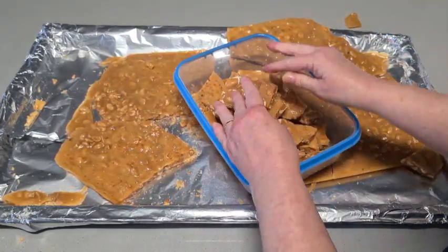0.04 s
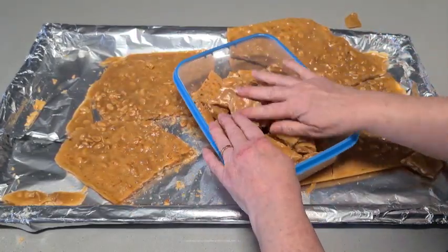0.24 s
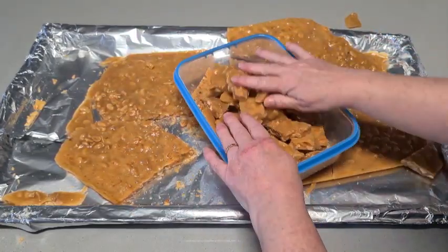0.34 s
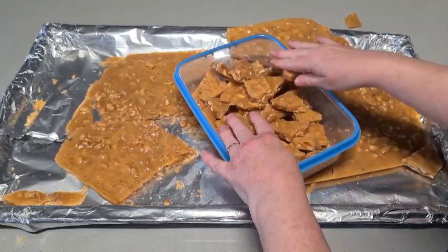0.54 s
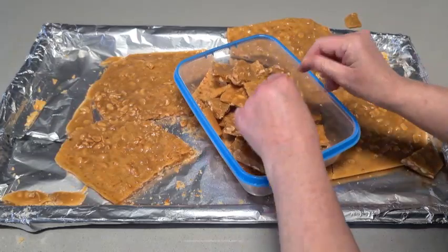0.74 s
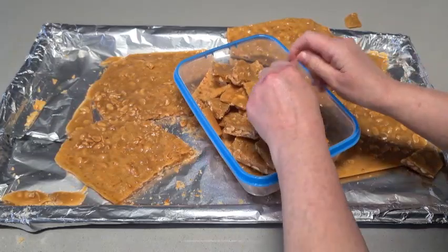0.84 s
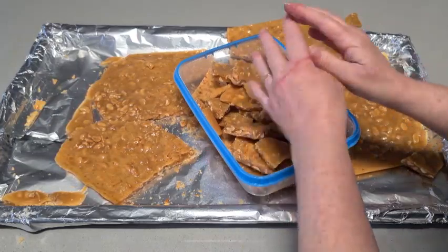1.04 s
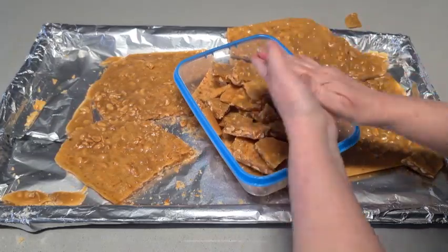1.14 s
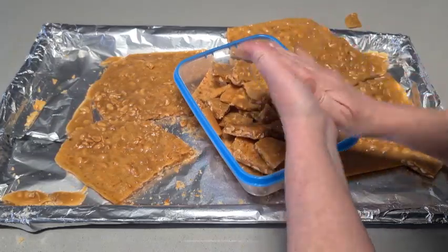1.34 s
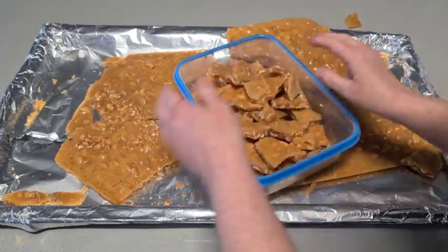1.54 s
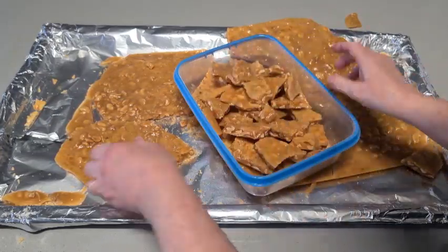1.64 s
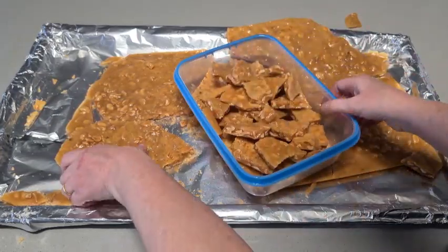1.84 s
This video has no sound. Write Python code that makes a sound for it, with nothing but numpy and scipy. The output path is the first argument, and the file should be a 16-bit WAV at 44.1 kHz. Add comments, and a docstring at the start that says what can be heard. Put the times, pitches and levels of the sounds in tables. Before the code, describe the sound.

Brittle candy shards are pressed and shifted by hand, clacking densely against plastic with foil crackle and a ringing tray, then sparse light ticks over faint hum, heard close in a small hard-walled kitchen.

```python
"""Over faint air and appliance hum, pieces of peanut brittle grind and foil rustles, then shards snap and knock.
Hands press and shift them in a plastic tub on a foil-lined tray: grains of filtered noise grind, rustle and slide.
Each knock is a noise crack, a noise thud of the tub and the damped modes of a shard; the tray rings on after it.
Heavy presses boom, loose pieces clink, and a decaying noise response adds the live kitchen."""
import sys
import numpy as np
from scipy import signal
from scipy.fft import rfft, irfft, next_fast_len
from scipy.io import wavfile

SR = 44100
rng = np.random.default_rng(int(sys.argv[2]) if len(sys.argv) > 2 else 0)


def wav_record(signal):
    """Record a signal, one row per channel, as 16-bit PCM in the file named by sys.argv[1]."""
    frames = np.transpose(np.atleast_2d(signal))
    bounded = np.clip(frames, -1, 1)
    # unit amplitude maps onto the largest positive 16-bit level
    quanta = np.round(bounded * 32767).astype(np.int16)
    wavfile.write(sys.argv[1], SR, quanta)


N = 83790
HIT_S, RING_S = 0.045, 0.36  # lengths of short and long sounds
CONTACT_S = 0.00035  # time constant of a contact's rise


def amp(db):
    """Decibels to gain."""
    return 10 ** (np.asarray(db) / 20)


def unit(x):
    """Scale to rms 1."""
    return x / np.sqrt(np.mean(x ** 2))


def fade(t, t60_s):
    """Exponential decay, 60 dB down at t60_s."""
    return np.exp(-np.log(1000) * t / t60_s)


def along(points):
    """Gain over time from (time_s, level_db) points."""
    time_s, level_db = np.array(points).T
    return amp(np.interp(np.arange(N) / SR, time_s, level_db))


FILTER_SIZE = 4096


def colour(x, points):
    """Minimum-phase filter through (freq_hz, level_db) points, by way of the folded cepstrum."""
    half = FILTER_SIZE // 2
    freq_hz, level_db = np.array(points).T
    bin_hz = np.arange(half + 1) * SR / FILTER_SIZE
    gain = amp(np.interp(np.log(bin_hz + 1), np.log(freq_hz), level_db))
    cepstrum = irfft(np.log(gain))
    cepstrum[1:half] *= 2
    response = irfft(np.exp(rfft(cepstrum[:half], FILTER_SIZE)))[:half]
    size = next_fast_len(x.shape[-1] + half, True)
    return irfft(rfft(x, size) * rfft(response, size), size)[..., :x.shape[-1]]


# difference between the two microphones: freq_hz, side_minus_mid_db
WIDTH = [(60, -7), (250, -16), (400, -10.5), (800, -3.5), (2000, -1.5), (6000, 2), (16000, 0.5)]


def stereo(pair):
    """Two unrelated signals become mid and side: alike in the bass, apart in the treble."""
    mid, side = pair[0], colour(pair[1], WIDTH)
    return np.array([mid + side, mid - side])


def grains(rate_hz, spread_db, t60_s, spectrum):
    """A stream of tiny decaying contacts of very uneven size, at rms 1."""
    size_db = spread_db * np.minimum(rng.exponential(size=N), np.pi)
    clicks = (rng.random(N) < rate_hz / SR) * amp(size_db)
    power = signal.lfilter([1], [1, -fade(2 / SR, t60_s)], clicks ** 2)
    noise = np.sqrt(power) * rng.standard_normal((2, N))
    return unit(colour(stereo(noise), spectrum))


def bursts(t60_s, spectrum, count):
    """Contacts, each one new: a fast rise and a dense, quickly damped ring of noise."""
    t = np.arange(int(HIT_S * SR)) / SR
    noise = rng.standard_normal((2, count, len(t)))
    envelope = fade(t, t60_s) * (1 - np.exp(-t / CONTACT_S))
    return colour(stereo(noise * envelope), spectrum).swapaxes(0, 1)


def pitched(modes, hz):
    """Mode ratios become frequencies."""
    return [(hz * ratio, db) for ratio, db in modes]


def ring(modes, t60_s, length_s, scatter_db, phase_cycles):
    """Damped modes of random strength and phase; with phase_cycles 0 the mid starts in step, as one hard knock."""
    t = np.arange(int(length_s * SR)) / SR
    pair = np.zeros((2, len(t)))
    for hz, db in modes:
        gain = amp(db + scatter_db * rng.standard_normal((2, 1)))
        phase = rng.random((2, 1)) * [[phase_cycles], [1]]  # the side is always random
        pair += gain * np.sin(2 * np.pi * (hz * t + phase))
    return stereo(pair * fade(t, t60_s) * (1 - np.exp(-t / CONTACT_S)))


# where the hands work: time_s, right (0 centre, 1 far right)
PLACE = [(0, 0.13), (.4, 0.16), (.61, .35), (.66, 0.13), (.8, 0.13), (1.1, 1), (1.37, 0.97), (1.54, 0.27),
         (1.65, 0.92)]
LEVEL_S = 0.003
# ears at far right; the left delay and both gains scale with place, the right delay is constant
LEFT_DELAY_S, LEFT_GAIN_DB = 0.00044, -2.1
RIGHT_DELAY_S, RIGHT_GAIN_DB = 0.00024, 0.18


def add(out, start_s, x, level_db):
    """Place a short sound where the hands are, its energy equal to LEVEL_S at level_db before panning."""
    right = np.interp(start_s, *np.array(PLACE).T)
    x = unit(x) * amp(level_db) * np.sqrt(LEVEL_S * SR / x.shape[1])
    ears = [(LEFT_GAIN_DB, abs(right * LEFT_DELAY_S)), (RIGHT_GAIN_DB, RIGHT_DELAY_S)]
    for ear, (gain_db, delay_s) in enumerate(ears):
        i = max(int((start_s + delay_s) * SR), 0)
        out[ear, i:i + x.shape[1]] += x[ear, :N - i] * amp(gain_db * right)


# still air: freq_hz, level_db
QUIET = [(20, -40), (55, 6), (130, -4.5), (200, -10.5), (400, -2), (600, -15.5), (1500, -27), (4000, -24.5),
         (9000, -34.5), (16000, -23)]
QUIET_DB, HUM_DB, HUM_HZ = -65, -64, 99.6


def background():
    """Still air as filtered noise and the hum of an appliance as one sine."""
    air = unit(colour(stereo(rng.standard_normal((2, N))), QUIET))
    hum = unit(np.sin(2 * np.pi * HUM_HZ * np.arange(N) / SR))
    return amp(QUIET_DB) * air + amp(HUM_DB) * hum


# pieces grinding together, before GRIT_DB: time_s, level_db
GRIND = [(0, -51.5), (.06, -60), (.168, -72), (.19, -48), (.225, -44), (.3, -30.5), (.325, -62),
         (.37, -42.5), (.42, -34.5), (.48, -37), (.55, -30), (.59, -47), (.66, -36.5), (.74, -45.5),
         (.88, -49.5), (1.0, -65), (1.08, -54.5), (1.2, -73), (1.5, -78.5), (1.61, -77), (1.7, -63.5),
         (1.77, -78), (1.9, -70)]
# spectrum of the grinding: freq_hz, level_db
GRIT = [(50, -19.5), (170, -30), (400, 6), (800, -0.5), (1400, 2.5), (2800, -3), (4300, -11), (6300, -26.5),
        (8500, -22.5), (16000, -48)]
GRIT_DB = -1.5


def grinding():
    """Rough edges catch and slip under the hands."""
    grit = grains(rate_hz=500, spread_db=1, t60_s=0.017, spectrum=GRIT)
    return amp(GRIT_DB) * along(GRIND) * grit


# foil rustle: time_s, level_db
FOIL = [(0, -53), (.09, -63.5), (.165, -73), (.2, -66), (.22, -49), (.27, -44), (.32, -69), (.37, -57),
        (.39, -47.5), (.47, -49), (.55, -49.5), (.66, -44.5), (.76, -56), (1.0, -71), (1.065, -55),
        (1.12, -74), (1.22, -89), (1.29, -68), (1.37, -64), (1.43, -89), (1.53, -88), (1.555, -55.5),
        (1.63, -66.5), (1.68, -60), (1.75, -73.5), (1.9, -63.5)]
# creases flicking over: start_s, level_db
CREASES = [(0.025, -45), (0.068, -54), (0.076, -47.5), (0.193, -50), (0.2057, -36), (0.23, -43),
           (0.25, -32), (.255, -27.5), (.258, -34), (0.382, -40.5), (0.397, -40), (.410, -36),
           (.541, -34.5), (1.253, -58.5), (1.5048, -48.5), (1.544, -47.5), (1.6456, -42), (1.661, -42),
           (1.756, -55), (1.7673, -48)]
# spectrum of rustle and creases: freq_hz, level_db
CRINKLE = [(400, -54), (1500, -11), (3500, -1.5), (4800, -0.5), (6600, 6), (8500, -5), (11000, -1),
           (13500, 1), (16000, -8)]
CREASE_T60_S = 0.023


def foil():
    """Single creases flick over above a fine rustle."""
    out = along(FOIL) * grains(rate_hz=4800, spread_db=4.5, t60_s=0.0089, spectrum=CRINKLE)
    creases = bursts(CREASE_T60_S, CRINKLE, count=len(CREASES))
    for (start_s, level_db), crease in zip(CREASES, creases):
        add(out, start_s, crease, level_db)
    return out


def through(x, response):
    """Pass sound through a response of unit energy."""
    response = unit(response) / np.sqrt(response.shape[1])
    return signal.fftconvolve(x, response, axes=1)[:, :N]


# spectrum of the kitchen's tail: freq_hz, level_db
KITCHEN = [(60, -21.5), (200, -4.5), (450, -2), (900, 1), (2500, 2.5), (6000, 3), (10000, 4.5),
           (16000, 3.5)]
ROOM_DB, ROOM_T60_S, ROOM_TREBLE_T60_S = -5, 0.69, 0.21
ROOM_START_S, ROOM_RISE_S = 0.0014, 0.0028


def kitchen(x):
    """Hard walls return a diffuse tail whose treble dies first."""
    t = np.arange(SR) / SR
    noise = stereo(rng.standard_normal((2, SR)))
    low = signal.sosfiltfilt(signal.butter(1, 3500, fs=SR, output="sos"), noise)
    tail = low * fade(t, ROOM_T60_S) + (noise - low) * fade(t, ROOM_TREBLE_T60_S)
    tail *= np.clip((t - ROOM_START_S) / ROOM_RISE_S, 0, 1)
    return amp(ROOM_DB) * through(x, colour(tail, KITCHEN))


# brittle snapping and knocking: start_s, thud_db, shard_db (before MUFFLE), shard_hz, crack_db
KNOCKS = [(.033, -84, -50, 2480, -47.5), (0.178, -56, -58, 1400, -60), (.212, -41, -36, 2440, -29.5),
          (.222, -40.5, -33, 1870, -38), (.239, -37, -33, 1320, -45), (0.265, -58, -27.5, 2390, -28),
          (.274, -45, -39, 1480, -42), (.287, -35.5, -31, 1650, -37.5), (.292, -27.5, -29.5, 1250, -39),
          (.299, -29, -31, 560, -52), (0.3907, -51, -30, 1350, -36), (0.4044, -35.5, -19, 2252, -30.5),
          (.4365, -39.5, -31, 1420, -40), (0.4468, -46, -33, 1920, -41), (0.477, -43.5, -43, 1450, -44),
          (0.5104, -28, -33, 1500, -33), (.527, -30.5, -40, 1390, -32.5), (.546, -26, -28, 1457, -35),
          (.559, -24.5, -35, 1300, -39), (.596, -29, -32, 1160, -49), (.605, -33, -39.5, 1550, -34.5),
          (.615, -21.5, -18, 1333, -21.5), (.6164, -28, -28.5, 1516, -22), (.6185, -20, -19, 770, -44),
          (.6452, -23, -23.5, 1410, -38), (.653, -27.5, -21, 1240, -47), (0.657, -22.5, -18, 1532, -30.5),
          (0.6654, -25, -20.5, 1655, -41), (.693, -26, -45, 1170, -41), (0.6976, -20.5, -24, 980, -54),
          (.725, -46, -39, 1220, -38.5), (0.7951, -30, -26, 1005, -39.5), (0.802, -49, -46, 1510, -41.5),
          (.908, -47, -38.5, 1350, -49), (0.9158, -40.5, -33, 1350, -38), (1.0608, -63.5, -42, 2000, -62),
          (1.0755, -53, -44, 1840, -56), (1.085, -58, -44.5, 1990, -70), (1.1173, -54.5, -37.5, 1884, -52),
          (1.127, -58, -44.5, 1890, -68), (1.171, -61.5, -53, 2120, -55.5), (1.247, -68, -58.5, 2120, -76),
          (1.3635, -64, -45.5, 2160, -70), (1.537, -63.5, -59, 2500, -48), (1.5422, -46, -45, 520, -58),
          (1.5432, -64, -44, 2640, -37), (1.698, -54.5, -52, 2090, -66.5)]
# modes of a shard in the pile: ratio (to shard_hz), level_db
SHARD = [(.77, -4), (1, 2.5), (1.22, 1), (1.44, -5), (1.8, -6.5), (2.4, -13)]
# a shard's clack carries no bass, and the pile muffles its treble: freq_hz, level_db
MUFFLE = [(140, -26), (550, 0), (3000, -1), (3900, -8), (9000, -12)]
SHARD_T60_S = 0.013
# ticks: strongest level over GRIND and range below it, before MUFFLE; lowest pitch and range above it
TICK_COUNT, TICK_DB, TICK_RANGE_DB = 190, 5, 14
TICK_HZ, TICK_OCTAVES = 1096, 1.2


def shards():
    """Struck pieces clack at their own pitch and small chips tick at random times, muffled by the pile."""
    out = np.zeros((2, N))
    clacks = [(start_s, shard_db, shard_hz) for start_s, _, shard_db, shard_hz, _ in KNOCKS]
    for when, softness, smallness in rng.random((TICK_COUNT, 3)):
        start_s = when * (N / SR - HIT_S)
        grind_db = np.interp(start_s, *np.array(GRIND).T)
        tick_db = grind_db + TICK_DB - TICK_RANGE_DB * softness
        clacks.append((start_s, tick_db, TICK_HZ * 2 ** (TICK_OCTAVES * smallness)))
    for start_s, level_db, hz in clacks:
        clack = ring(pitched(SHARD, hz), SHARD_T60_S, HIT_S, scatter_db=3, phase_cycles=0)
        add(out, start_s, clack, level_db)
    return colour(out, MUFFLE)


# spectrum of a crack: freq_hz, level_db
CRACK = [(400, -4), (1500, -4.5), (3500, 1.5), (4300, -2), (5200, 2.5), (6500, 1.5), (8200, -13),
         (13000, -9.5), (16000, -16)]
# spectrum of a tub thud: freq_hz, level_db
THUD = [(40, -51), (150, -30), (230, -11), (360, 4), (560, -1), (780, 3), (1200, -11), (2200, -18.5),
        (6000, -38.5)]
CRACK_T60_S, THUD_T60_S = 0.011, 0.029


def knocks():
    """Each knock cracks sharply and thumps the tub."""
    out = np.zeros((2, N))
    cracks = bursts(CRACK_T60_S, CRACK, count=len(KNOCKS))
    thuds = bursts(THUD_T60_S, THUD, count=len(KNOCKS))
    for (start_s, thud_db, _, _, crack_db), crack, thud in zip(KNOCKS, cracks, thuds):
        add(out, start_s, crack, crack_db)
        add(out, start_s, thud, thud_db)
    return out


# modes of tub and tray: mode_hz
TRAY_HZ = [231, 350, 428, 456, 695, 736, 788, 812, 1135, 1216, 1340, 1443, 1563, 1825]
# their strengths: level_db
TRAY_MODE_DB = [-4.5, -4, -2, 0.5, 1, 0, -3, 0.5, -5, -1, -8, -3.5, -8, -9.5]
TRAY_DB, TRAY_T60_S, SPOT_COUNT = -5.5, 0.33, 4  # TRAY_DB is relative to the thud


def tray():
    """Each thud sets the tray ringing, struck at a few spots in turn."""
    out = np.zeros((2, N))
    modes = list(zip(TRAY_HZ, TRAY_MODE_DB))
    spots = [ring(modes, TRAY_T60_S, RING_S, scatter_db=0, phase_cycles=0.98) for _ in range(SPOT_COUNT)]
    for k, (start_s, thud_db, _, _, _) in enumerate(KNOCKS):
        add(out, start_s, spots[k % SPOT_COUNT], thud_db + TRAY_DB)
    return out


# booms under the weight of the hands: start_s, level_db, lowest_mode_hz
BUMPS = [(0.288, -43, 151), (0.523, -41, 128), (.616, -25.5, 276.6), (.647, -29.5, 238.5),
         (.695, -40.5, 189), (0.9142, -35.5, 340.4), (1.117, -44, 330), (1.5422, -50.5, 287)]
# modes of a boom: ratio (to lowest_mode_hz), level_db
BUMP = [(1, 3), (1.27, 1.5)]
BUMP_T60_S = 0.076
BUMP_BASS_DB = -21  # gain an octave below the lowest mode: the booms carry little deep bass


def booms():
    """Heavy presses make tub and tray boom on two low modes."""
    out = np.zeros((2, N))
    for start_s, level_db, hz in BUMPS:
        boom = ring(pitched(BUMP, hz), BUMP_T60_S, RING_S, scatter_db=0.5, phase_cycles=0.99)
        add(out, start_s, colour(boom, [(hz / 2, BUMP_BASS_DB), (hz, 0)]), level_db)
    return out


# loose pieces clinking: start_s, level_db, lowest_mode_hz, t60_s
CLINKS = [(.6158, -29, 3700, .03), (.9158, -35, 5110, 0.0073), (1.246, -57.5, 2420, 0.034),
          (1.3641, -40.5, 2760, 0.034)]
# modes of a loose piece: ratio (to lowest_mode_hz), level_db
FREE_PIECE = [(1, 5), (1.53, -7), (1.872, 1.5), (2.27, -6)]


def clinks():
    """Pieces that come free ring on modes of their own, mostly higher and longer than in the pile."""
    out = np.zeros((2, N))
    for start_s, level_db, hz, t60_s in CLINKS:
        clink = ring(pitched(FREE_PIECE, hz), t60_s, RING_S, scatter_db=2.5, phase_cycles=1)
        add(out, start_s, clink, level_db)
    return out


# nudges of the tub over the foil: start_s, length_s, peak_db
SLIDES = [(1.007, 0.16, -54.5), (1.599, 0.074, -59.5), (1.662, 0.078, -53)]
# spectrum of the sliding: freq_hz, level_db
SLIDE = [(120, -22), (250, -13), (340, -3), (420, 9.5), (500, -3.5), (620, -12), (1200, -32), (2200, -11.5),
         (3500, -26), (8000, -47)]


def sliding():
    """The tub is nudged and judders softly over the foil."""
    t = np.arange(N) / SR
    push = np.zeros(N)
    for start_s, length_s, peak_db in SLIDES:
        push += amp(peak_db) * np.sin(np.pi * np.clip((t - start_s) / length_s, 0, 1))
    return push * grains(rate_hz=220, spread_db=2, t60_s=0.011, spectrum=SLIDE)


# share of each sound that escapes the tub into the room
SHARD_WET, CLINK_WET, GRIND_WET = 0.33, 0.16, 0.83


def scene():
    """The work on the counter, in its room."""
    grit, clacks, loose = grinding(), shards(), clinks()
    open_sounds = foil() + knocks() + tray() + booms() + sliding()
    to_room = open_sounds + SHARD_WET * clacks + CLINK_WET * loose + GRIND_WET * grit
    return background() + open_sounds + clacks + loose + grit + kitchen(to_room)


TOP_HZ = 16000


def record(dry):
    """The recorder cuts the top with a steep elliptic low-pass."""
    return signal.sosfilt(signal.ellip(10, 0.2, 70, TOP_HZ, fs=SR, output="sos"), dry)


dry = scene()
out = record(dry)
wav_record(out)
```